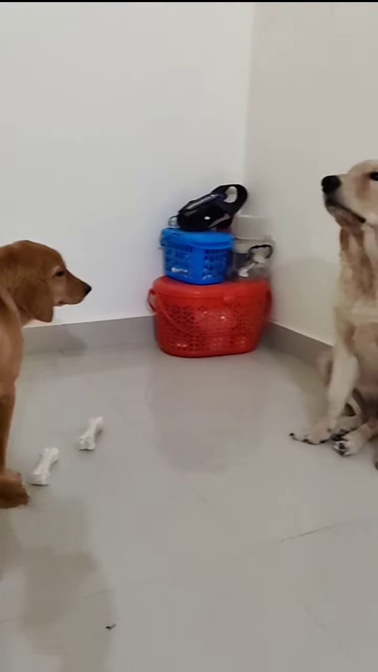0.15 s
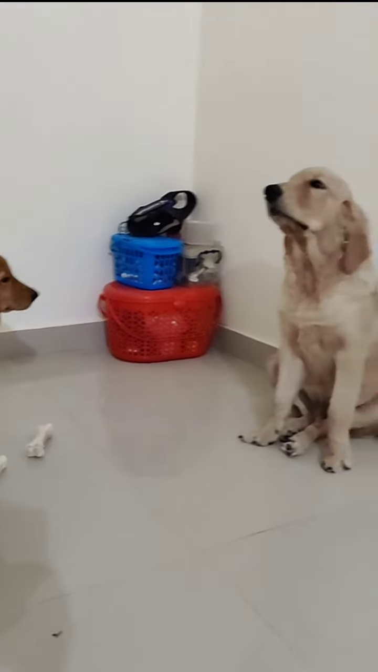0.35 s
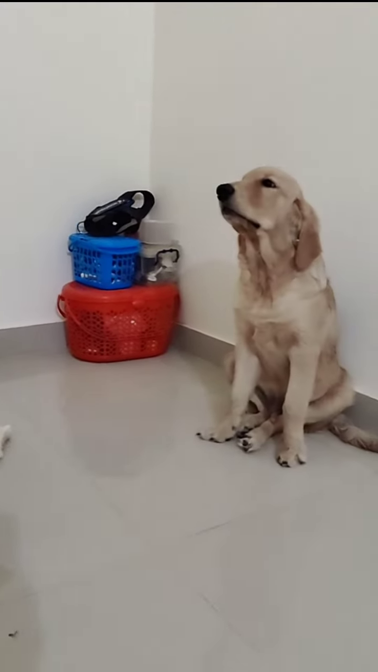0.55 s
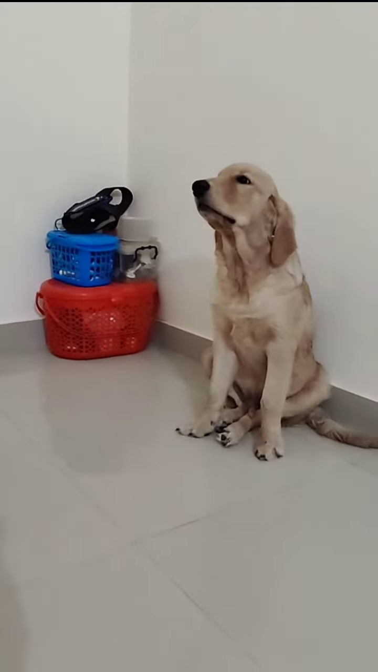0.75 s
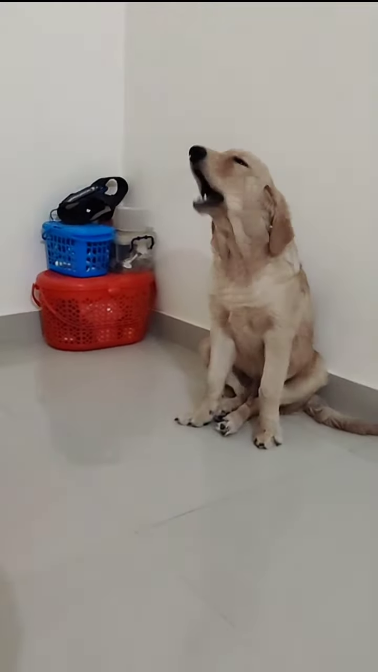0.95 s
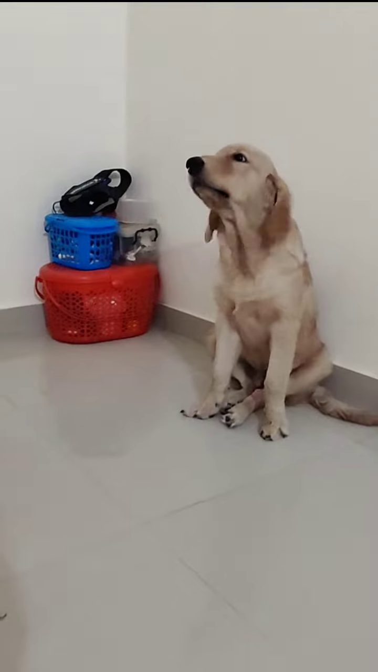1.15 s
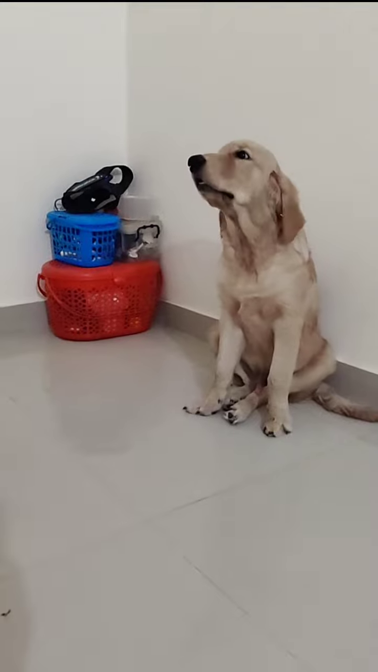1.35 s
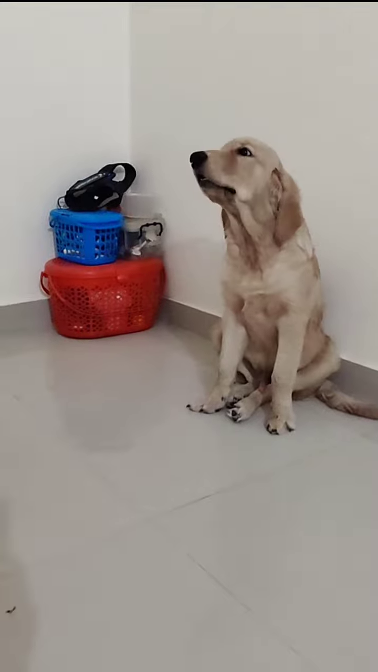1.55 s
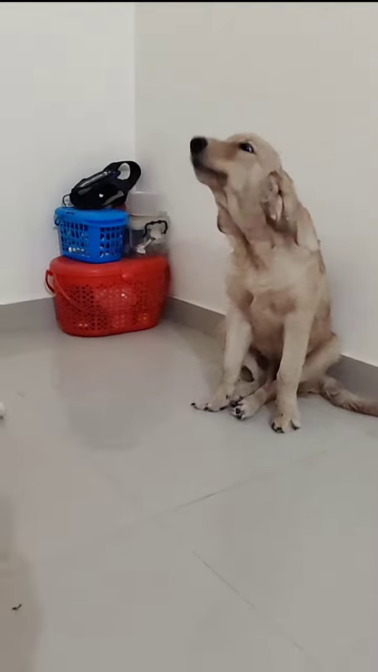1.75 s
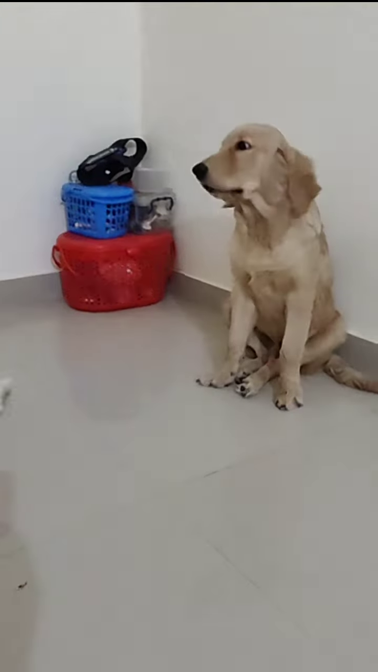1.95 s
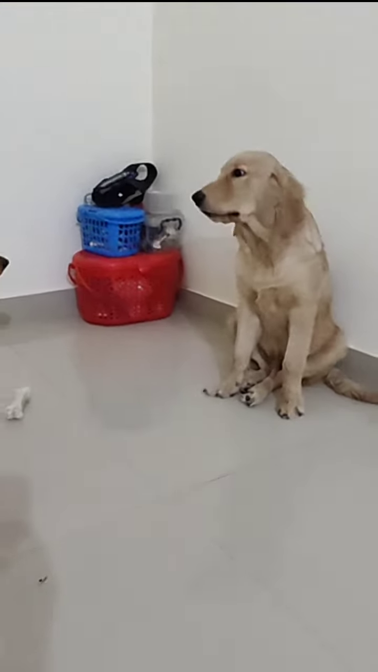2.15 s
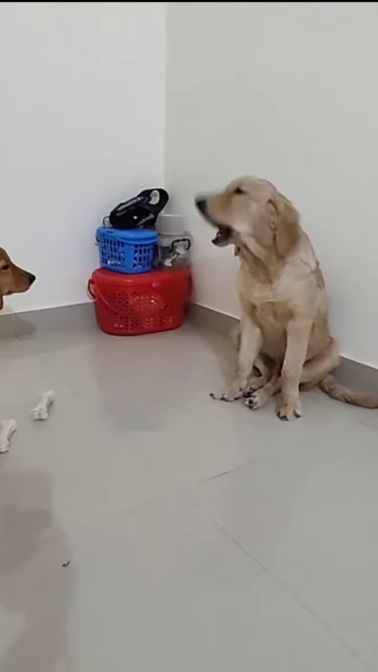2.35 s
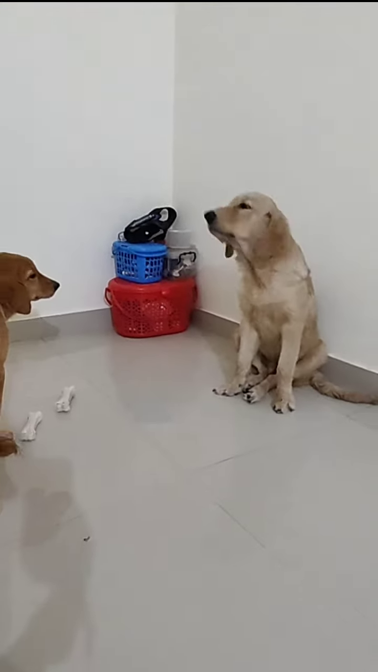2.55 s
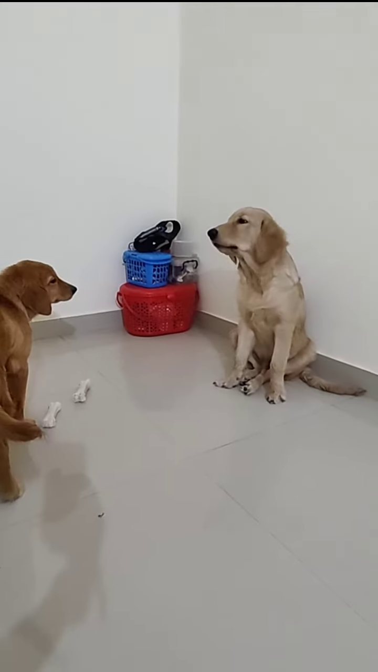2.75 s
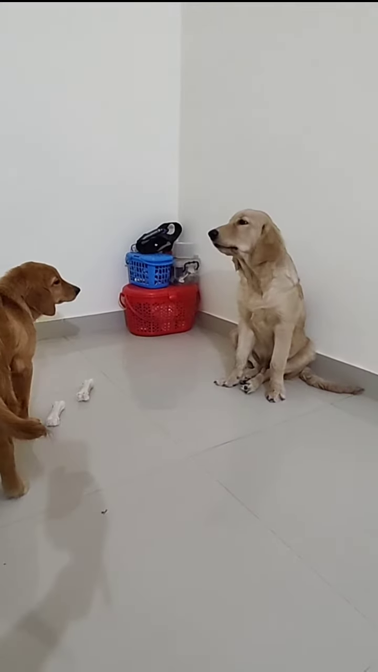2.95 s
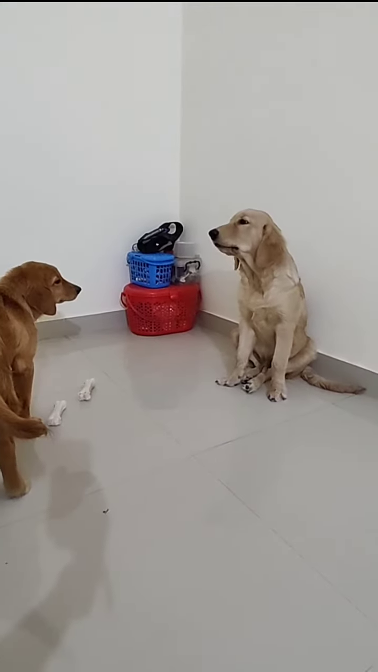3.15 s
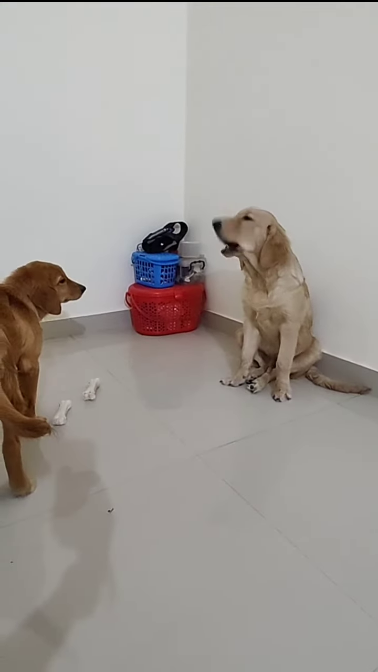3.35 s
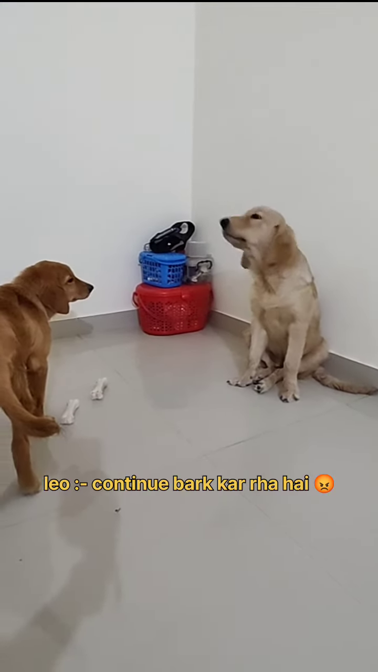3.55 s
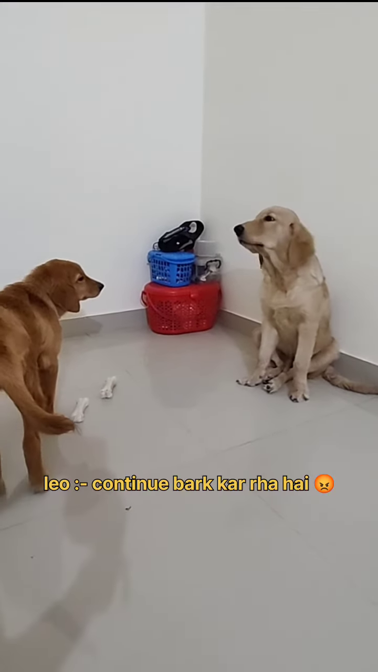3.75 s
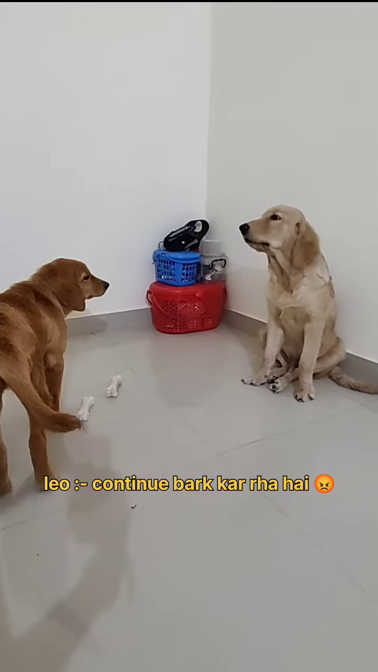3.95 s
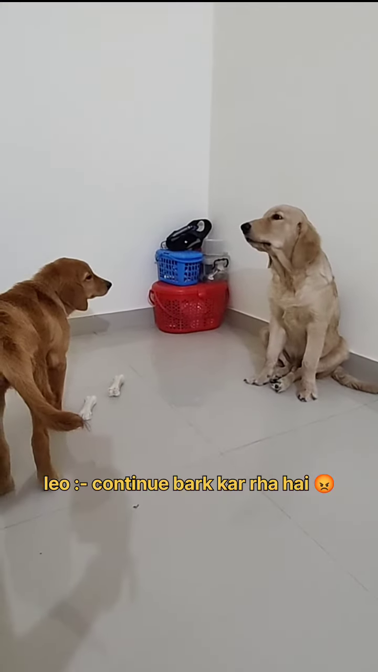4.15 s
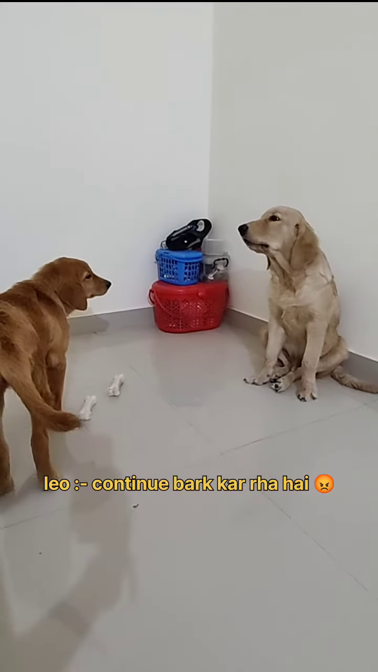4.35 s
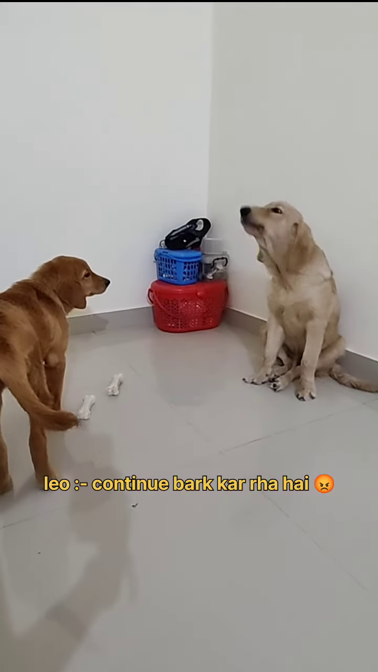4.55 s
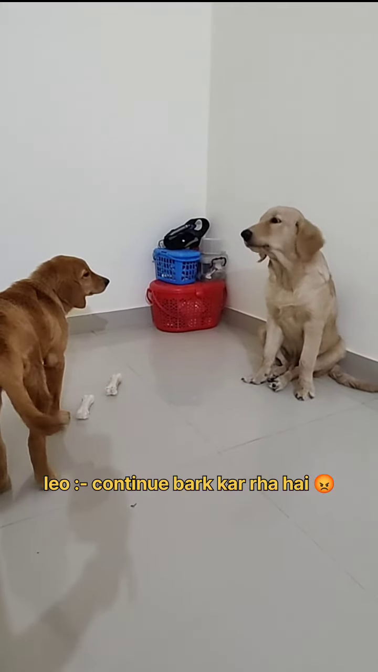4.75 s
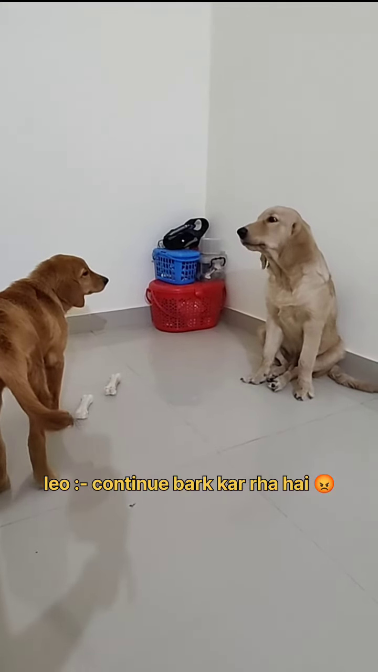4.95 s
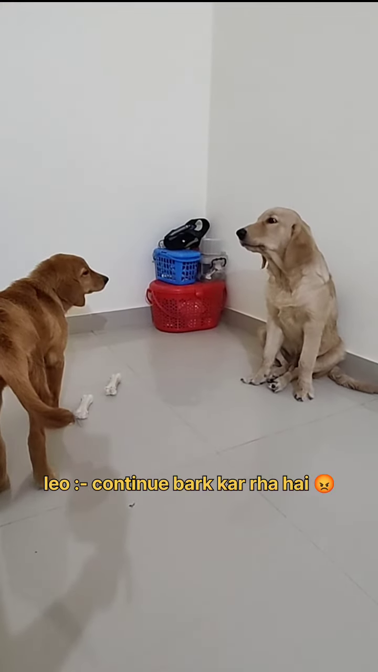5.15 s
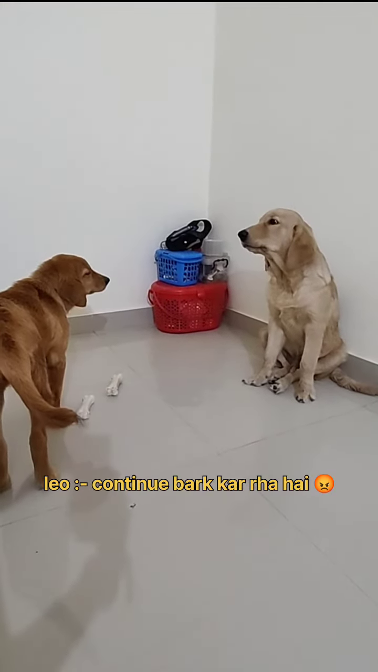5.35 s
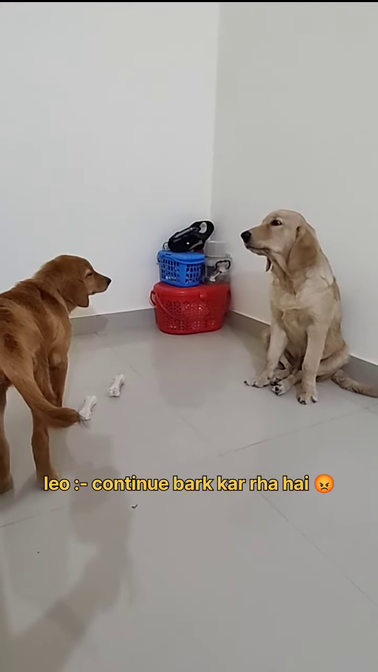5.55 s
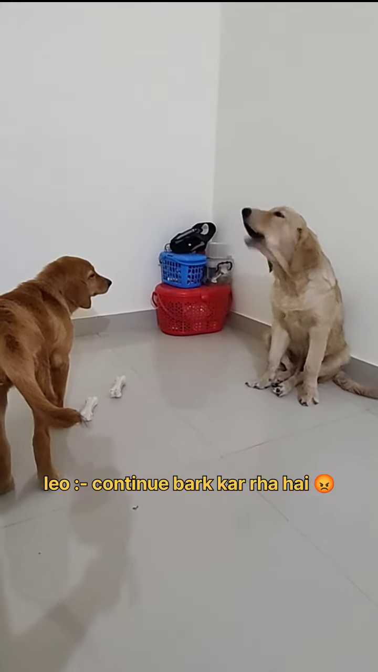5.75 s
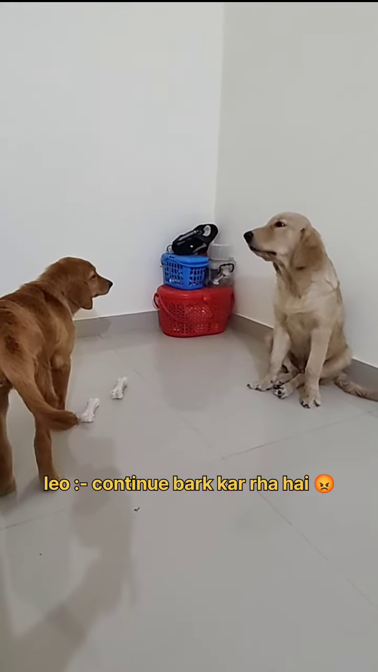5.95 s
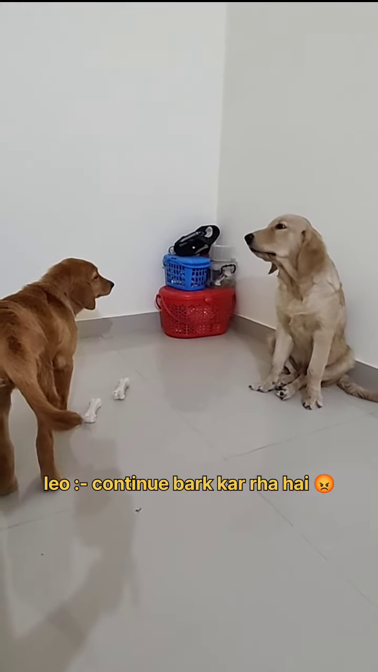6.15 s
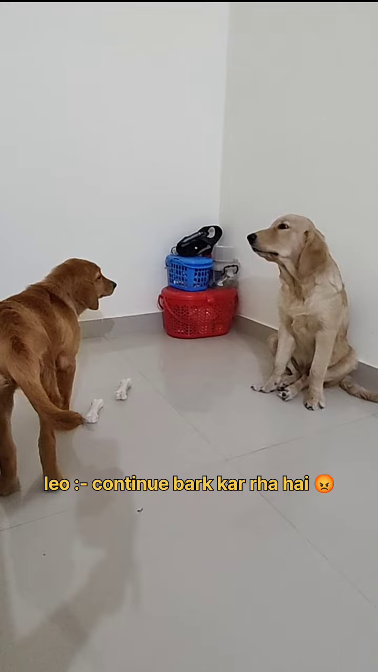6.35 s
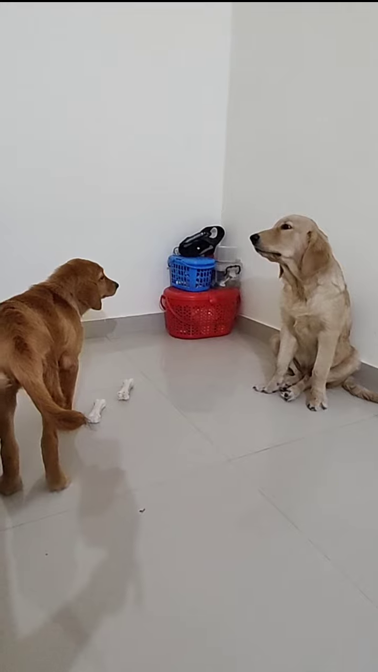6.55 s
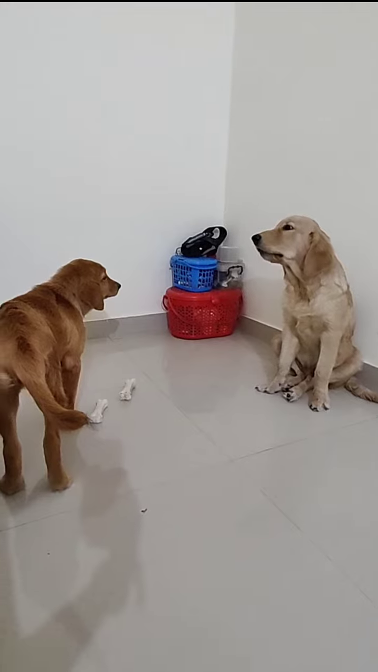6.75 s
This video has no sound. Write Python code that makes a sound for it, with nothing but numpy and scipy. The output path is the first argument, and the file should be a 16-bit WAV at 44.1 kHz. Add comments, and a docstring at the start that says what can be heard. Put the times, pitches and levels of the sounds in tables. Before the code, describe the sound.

Six sharp, raspy barks from a big dog ring between hard walls, over soft microphone bumps, with growl and two dull knocks before the last.

```python
"""Large dog barking in a bare tiled room

Six barks, each a quiet clean glide that turns hoarse as the jaw opens; some end in a short grunt.
A low growl and two soft knocks come before the last bark. All of these ring on between hard walls.
The voice is vocal-fold pulses and puffs of noise, filtered by throat and mouth.
The hand-held microphone adds soft bumps and lumpy rumble, over a faint room hiss of filtered noise."""
import sys
import numpy as np
from scipy import signal
from scipy.fft import rfft, irfft, next_fast_len
from scipy.io import wavfile
from scipy.ndimage import uniform_filter1d, minimum_filter1d

SR = 44100
rng = np.random.default_rng(int(sys.argv[2]) if len(sys.argv) > 2 else 0)


def master(y):
    """Save y as 16-bit WAV."""
    cut = np.clip(np.atleast_2d(y).T, -1, 1)
    pcm = np.round(cut * 32767)  # scale
    wavfile.write(sys.argv[1], SR, pcm.astype(np.int16))


N = 303849   # length [samples]


def from_db(db):
    """Decibels to amplitude gain."""
    return 10 ** (np.asarray(db) / 20)


def rms_one(x):
    """Scale to unit rms."""
    return x / np.sqrt(np.mean(x ** 2) + 1e-20)


def ramp(x):
    """Rise from 0 to 1 and stay there."""
    return np.clip(x, 0, 1)


def gate(age, attack_s, length_s, release_s):
    """Gain that is up by age 0, holds for the length, then dies by 60 dB over the release."""
    release = np.clip((age - length_s) / release_s, 0, 2)
    return ramp(1 + age / attack_s) * np.exp(-np.log(1000) * release)


def in_time(rows):
    """Each column of a curve after its time column, sample by sample."""
    times, *columns = np.transpose(rows)
    return [np.interp(np.arange(N) / SR, times, column) for column in columns]


def events_in_time(rows, ahead_s=.15):
    """Sample by sample: the age of the current event, taken up a little ahead, then its other columns."""
    t, rows = np.arange(N) / SR, np.array(rows)
    current = np.maximum(np.searchsorted(rows[:, 0] - ahead_s, t) - 1, 0)
    start, *columns = rows[current].T
    return [t - start, *columns]


def at_hz(points, hz):
    """Read a spectrum table on a log-frequency axis."""
    known_hz, values = np.transpose(points)
    return np.interp(np.log(np.maximum(hz, 1)), np.log(known_hz), values)


def colour(x, spectrum):
    """Causal (minimum-phase) filter with the given spectrum, built by folding its cepstrum."""
    size = 2 * next_fast_len(N // 2 + SR // 10)
    hz = np.arange(size // 2 + 1) * SR / size
    cepstrum = irfft(np.log(from_db(at_hz(spectrum, hz))))
    cepstrum[1:size // 2] *= 2
    cepstrum[size // 2 + 1:] = 0
    return irfft(rfft(x, size) * np.exp(rfft(cepstrum)))[:N]


def filtered(x, order, hz, kind="low"):
    """Butterworth filter."""
    return signal.sosfilt(signal.butter(order, hz, kind, fs=SR, output="sos"), x)


def wobble(rate_hz):
    """Random motion up to about the given rate, spread 1."""
    return rms_one(filtered(rng.standard_normal(N), 2, rate_hz))


# spectrum of the room hiss: (frequency [Hz], relative level per Hz [dB])
HISS_SPECTRUM = [(30, -10), (130, -10), (300, 4), (550, -5), (1100, -7), (2400, -17.5), (4200, -26),
                 (5700, -38), (7200, -24), (9000, -41), (15000, -49)]


def room_hiss(rms_db=-56):
    """Steady noise, strongest in the low-mids, under everything at the microphone."""
    return from_db(rms_db) * rms_one(colour(rng.standard_normal(N), HISS_SPECTRUM))


# spectrum of the handling rumble: (frequency [Hz], relative level per Hz [dB])
RUMBLE_SPECTRUM = [(20, -12.5), (40, -5), (65, 1.5), (110, -4.5), (170, -8.5), (300, -19.5), (700, -29),
                   (2000, -69)]
# restlessness of the hand: (time [s], rumble level [dB])
HAND_RESTLESSNESS = [(0, -72.5), (.45, -51), (1.0, -50), (1.25, -57), (2.65, -55.5), (3.0, -44.5),
                     (3.2, -61), (3.47, -39), (3.9, -50), (5.85, -50), (6.25, -71), (6.6, -51), (6.89, -58)]


def hand_rumble(lumpy_db=3, lump_rate_hz=25):
    """The hand shifts on the microphone: low noise with a lumpy level."""
    noise = colour(rng.standard_normal(N), RUMBLE_SPECTRUM)
    lumpy = rms_one(noise * from_db(lumpy_db * wobble(lump_rate_hz)))
    level_db, = in_time(HAND_RESTLESSNESS)
    return from_db(level_db) * lumpy


def thuds(rows, hz, rise_s):
    """Soft blows: each is a sine whose envelope swells to its peak and dies within a few cycles."""
    out = np.zeros(N)
    for start, peak_db in rows:
        age = np.clip(np.arange(N) / SR - start, 0, 1)
        envelope = age / rise_s * np.exp(1 - age / rise_s)
        out += from_db(peak_db) * envelope * np.sin(2 * np.pi * hz * age)
    return out


# bumps of the hand on the microphone: (time [s], envelope peak [dB])
HAND_BUMPS = [(0.471, -39), (0.579, -37), (.685, -31), (.97, -39), (1.536, -38), (2.1, -29.5), (2.98, -47),
              (3.325, -38), (3.399, -28), (3.485, -41), (3.844, -33.5), (4.275, -41), (5.24, -32.5),
              (6.616, -40.5)]


def hand_bumps():
    """Low thuds straight at the microphone, without room."""
    return thuds(HAND_BUMPS, hz=61.2, rise_s=0.0054)


def floor_and_wall(x, floor_s=0.002048, floor_db=-8, wall_s=.0047, wall_db=-9):
    """Floor and wall behind the dog echo on paths 0.7 m and 1.6 m longer; gliding harmonics swell and dip."""
    at = np.arange(N)
    out = x
    for delay_s, level_db in [(floor_s, floor_db), (wall_s, wall_db)]:
        out = out + from_db(level_db) * np.interp(at - np.round(delay_s * SR), at, x, left=0)
    return out


# standing waves between the walls, and dips between them: (frequency [Hz], width [Hz], boost [dB])
STANDING_WAVES = [(196, 7.3, 2.5), (488.4, 51, 7), (526, 38, -14.5), (613, 5.5, 11.5), (672.2, 10, 6.5),
                  (792, 14, 16), (785, 85, -10.5), (1050, 200, 1.5), (1061, 36, -5), (1133.7, 8.5, -8.5),
                  (1268, 97, -8), (1346, 14, 8), (1646, 80, 3.5), (1740, 28, -10.5), (1800, 20, 1.5),
                  (2130, 22, 8.5)]
# decay of the room: (frequency [Hz], time to die by 60 dB [s])
ROOM_DECAY = [(150, 0.93), (550, 0.88), (1100, 0.81), (2200, 0.72), (4500, 0.65), (7500, 0.53),
              (11000, 0.3), (15000, 0.38)]


def room(x, direct_db=-.5, tail_db=2.22, first_echo_s=0.0046, build_s=0.011):
    """Echoes thicken into a diffuse tail, mostly shorter in the treble; some standing waves stand out."""
    t = np.arange(int(1.4 * SR)) / SR
    size = 2 * len(t)
    hz = np.arange(size // 2 + 1) * SR / size
    white = rfft(rng.standard_normal(size))
    band_hz, band_t60 = np.transpose(ROOM_DECAY)
    tail = 0
    # overlapping bands of noise, each with its own decay
    for t60, share in zip(band_t60, np.eye(len(band_t60))):
        band = np.interp(hz, band_hz, share)
        tail = tail + irfft(white * band)[:len(t)] * from_db(-60 * t / t60)
    onset = ramp((t - first_echo_s) / build_s)
    # the walls return all pitches about equally, apart from the standing waves
    echoes = rfft(tail * onset, size)
    echoes /= np.sqrt(uniform_filter1d(np.abs(echoes) ** 2, size=70))
    boost_db = sum(db / (1 + (2 * (hz - mode_hz) / width) ** 2) for mode_hz, width, db in STANDING_WAVES)
    response = irfft(echoes * from_db(tail_db + boost_db))[:len(t)] * onset
    return from_db(direct_db) * floor_and_wall(x) + signal.fftconvolve(x, response)[:N]


# two soft, dull knocks: (time [s], envelope peak before the room [dB])
SOFT_KNOCKS = [(5.355, -44.5), (5.46, -42.5)]


def knocks():
    """Short mid-pitched thuds out in the room."""
    return thuds(SOFT_KNOCKS, hz=508.5, rise_s=0.0034)


def folds(pitch, count):
    """Vocal-fold pulses made of equally strong harmonics, and their phase."""
    phase = 2 * np.pi * np.cumsum(pitch) / SR
    half = phase / 2
    return np.sin((2 * count + 1) * half) / (2 * np.sin(half)) - .5, phase


# throat behind a closed mouth: (frequency [Hz], gain [dB])
CLOSED_THROAT = [(60, -20.5), (95, -3), (135, -13), (195, 2.5), (280, -2.5), (390, -12), (480, -20.5),
                 (700, -26), (860, -16), (1300, -42), (3000, -43), (8000, -65)]


def low_voice(pitch, effort, jitter=0.013, shimmer=.25, waver_hz=30, level_db=-3):
    """Slow, slightly unsteady pulses behind a closed mouth."""
    pulses, _ = folds(pitch * (1 + jitter * wobble(waver_hz)), count=30)
    unsteady = pulses * (1 + shimmer * wobble(waver_hz))
    return colour(unsteady * effort * from_db(level_db), CLOSED_THROAT)


# the growl before the last bark: (time [s], mean pitch [Hz], relative effort [dB])
GROWL_COURSE = [(4.8, 107.8, -54.5), (4.898, 116.1, -47), (5.132, 112.3, -42.5), (5.25, 101.8, -44.5),
                (5.42, 102.2, -49), (5.581, 94.55, -40), (5.77, 93.9, -47), (5.84, 95, -50.5)]


def growl(fade_s=0.013):
    """One long low note that rises a little, then sinks."""
    pitch, effort_db = in_time(GROWL_COURSE)
    start, end = GROWL_COURSE[0][0], GROWL_COURSE[-1][0]
    age = np.arange(N) / SR - start
    return low_voice(pitch, from_db(effort_db) * gate(age, fade_s, end - start, fade_s))


# grunts in which some barks end: (time [s], held length [s], pitch at that time [Hz], relative effort [dB])
BARK_GRUNTS = [(1.93, 0.014, 113, -40.5), (3.60, .05, 143.1, -39.5), (4.71, 0.085, 116, -39),
               (5.97, .07, 139.2, -39)]


def grunts(attack_s=0.012, release_s=0.14, sag_octaves_per_s=2.8):
    """Short low notes that sink in pitch as they die."""
    age, length, first_hz, effort_db = events_in_time(BARK_GRUNTS)
    pitch = first_hz * 2 ** (-sag_octaves_per_s * ramp(age))
    return low_voice(pitch, from_db(effort_db) * gate(age, attack_s, length, release_s))


LEAD_DB_PER_S, ATTACK_S, SWELL_DB = 521, 0.016, 13   # steady rise up to full voice, and an added swell
START_S, RELEASE_S = 0.005, 0.039   # the voice sets in; it dies by 60 dB
SAG_CURVE = 2.1   # after the glide the pitch sags ever faster
LEAD_ROUGH, CLEAN_ROUGH = .3, .16   # roughness 0-1 of the lead-in and of the clean part
BREAK_S, ROUGH_PER_S = .014, 1.2   # time the voice takes to break, growth of roughness after it
ROUGH_LOSS_DB = 0.5   # a broken voice carries less than a clean one
JAW_LEAD, JAW_PUSH = 0.49, 0.082   # share of its opening in the lead-in, opening 0-1 at the push
JAW_OPEN_S, JAW_CLOSES = 0.01, 0.27   # time to open, share of the opening lost by the end
MOUTH_START_HZ, MOUTH_START_DB, MOUTH_SLIDE_S = 1167, -5, 0.06   # start pitch, gain offset, slide time
BITE_FADE_DB_PER_S = 110.5
# the barks: (time of full voice [s], quiet lead-in before it [s], clean part [s], length [s],
#   pitch glide [s], ease of the glide [1 = straight], first pitch [Hz], held pitch [Hz], last pitch [Hz],
#   relative effort [dB], fade over the length [dB], hoarseness at the break [0-1], jaw opening [0-1],
#   settled mouth resonance [Hz], its settled gain [dB], bright bite at full voice [dB])
BARK_GESTURES = [ (1.121, .017, 0.0045, 0.081, .058, 2.3, 890.5, 543.7, 522.4, -12, 7.8, 0.661, 0.79, 1070, 7, 6.5),
                 (1.817, 0.02, 0.0036, .112, .052, 1.2, 785, 514.4, 468, -11, 14, .82, 1, 1006, 0.5, 7.5),
                 (2.524, .020, .044, .100, .054, 1.3, 505.7, 667.6, 569.6, -12.5, 2.33, 0.442, 0.27, 1138, -3, 2),
                 (3.529, 0.044, 0.02, .120, .063, 1.087, 400, 604.7, 440.1, -10, 12.35, .62, 0.63, 1064, 9, 6),
                 (4.588, .017, 0.016, .135, .080, 1.0, 815, 562.7, 430.7, -13, 11.3, 0.865, 0.98, 1036, 1, 5.5),
                 (5.858, .038, 0.018, 0.14, .068, 1.2, 410, 608.1, 470, -11.5, 8.7, .76, .58, 1137, 8.5, 6.5)]


def bark_controls():
    """One gesture a bark: quiet clean glide, push, hoarse break as the jaw opens, sag as air runs out."""
    (age, lead, clean, length, glide, ease, first_hz, held_hz, last_hz, peak_db, fade_db,
     hoarse, opening, ring_hz, ring_db, bite_db) = events_in_time(BARK_GESTURES)
    voiced = age + lead
    spent = ramp(age / length)
    push = ramp(1 + age / ATTACK_S)

    sag = np.clip((voiced - glide) / (lead + length - glide), 0, 2) ** SAG_CURVE
    glided_hz = held_hz + (first_hz - held_hz) * ramp(1 - voiced / glide) ** ease
    pitch = glided_hz * (last_hz / held_hz) ** sag

    smooth = LEAD_ROUGH + (CLEAN_ROUGH - LEAD_ROUGH) * push
    broken = ramp(.5 + (age - clean) / BREAK_S)
    rough = smooth + (hoarse - smooth) * broken + ROUGH_PER_S * ramp(age - clean)

    level_db = peak_db + LEAD_DB_PER_S * np.minimum(age, 0) - SWELL_DB * (1 - push) - fade_db * spent
    level_db = level_db + ROUGH_LOSS_DB * (.5 - rough)
    effort = from_db(level_db) * gate(voiced, START_S, lead + length, RELEASE_S)

    narrow = JAW_LEAD * opening * (1 - push) + JAW_PUSH * push
    wide = opening * (1 - JAW_CLOSES * spent ** 2)
    jaw = narrow + (wide - narrow) * ramp((age - clean) / JAW_OPEN_S)

    slide = ramp(1 - age / MOUTH_SLIDE_S)
    mouth_hz = ring_hz + (MOUTH_START_HZ - ring_hz) * slide
    mouth_db = ring_db + MOUTH_START_DB * slide
    bite_db = bite_db - BITE_FADE_DB_PER_S * ramp(age)
    return pitch, effort, ramp(rough), ramp(jaw), mouth_hz, mouth_db, bite_db


def resonance(x, centre_hz, width_hz):
    """A moving resonance with gain 1 on top: shift to 0 Hz, smooth, shift back."""
    turn = np.exp(2j * np.pi * np.cumsum(centre_hz) / SR)
    r = np.exp(-np.pi * width_hz / SR)
    return 2 * np.real(turn * signal.lfilter([1 - r], [1, -r], x / turn))


# throat and mouth, jaw nearly shut: (frequency [Hz], gain [dB])
JAW_SHUT = [(200, -39), (380, -23), (490, -4), (640, 0.5), (830, 3.5), (1000, -13.5), (1800, -11),
            (2450, -25.5), (3000, -55.5), (4200, -35), (5800, -48), (6700, -28.5), (8200, -40),
            (15000, -49)]
# throat and mouth, jaw wide open: (frequency [Hz], gain [dB])
JAW_WIDE = [(200, -25.5), (370, -18.5), (470, -4.5), (640, 0), (830, -1), (1100, 3), (1350, -6), (1850, -7),
            (2620, -10.5), (3000, -32.5), (4300, -26), (5800, -34), (6850, -17), (8100, -29),
            (15000, -38.5)]


def barks(jitter=.08, shimmer=0.61, uneven=0.35, unsteady_hz=220, fold_hz=2600, rasp_db=8,
          air_db=-1, edge_db=-10, air_hz=3100, flutter_db=3.5, flutter_hz=110):
    """Driven hard, the folds beat irregularly and chop the air into a rasp; the jaw sets the colour."""
    pitch, effort, rough, jaw, mouth_hz, mouth_db, bite_db = bark_controls()
    sharp, phase = folds(pitch * (1 + jitter * rough * wobble(unsteady_hz)), count=20)
    # the folds close softly, so the low harmonics are strongest
    pulses = filtered(sharp, 2, fold_hz)
    # strong and weak cycles alternate, which fills in between the harmonics
    pulses = pulses * (1 + rough * (shimmer * wobble(unsteady_hz) + uneven * np.cos(phase / 2)))
    # air escapes in one puff per cycle, a full rasp when the voice is rough
    puffs = (1 + np.cos(phase)) / 2 * from_db(flutter_db * wobble(flutter_hz))
    rasp = rough * from_db(rasp_db) * puffs * rng.standard_normal(N)
    # the first push adds a bright bite of hiss and high harmonics
    bite = from_db(air_db) * puffs * rng.standard_normal(N) + from_db(edge_db) * sharp
    bite = from_db(bite_db) * filtered(bite, 4, air_hz, "high")
    source = (pulses + rasp + bite) * effort
    wide = colour(source * jaw, JAW_WIDE)
    narrow = colour(source * (1 - jaw), JAW_SHUT)
    return narrow + wide + from_db(mouth_db) * resonance(wide, mouth_hz, width_hz=42)


def scene():
    """The dog and the knocks ring in the room; hiss and handling noise reach the microphone dry."""
    background = room_hiss() + hand_rumble() + hand_bumps()
    heard = room(knocks() + growl() + grunts() + barks())
    return (background + heard)[None]


def record(dry, ceiling=.85, limiter_s=.004, cutoff_hz=15600):
    """A fast limiter turns the gain down around the highest peaks; then the top treble is cut."""
    size = int(limiter_s * SR)
    needed_gain = ceiling / np.maximum(np.abs(dry), ceiling)
    gain = uniform_filter1d(minimum_filter1d(needed_gain, size), size)
    low_pass = signal.ellip(12, .1, 90, cutoff_hz, fs=SR, output="sos")
    return signal.sosfilt(low_pass, dry * gain)


dry = scene()
out = record(dry)
master(out)
```